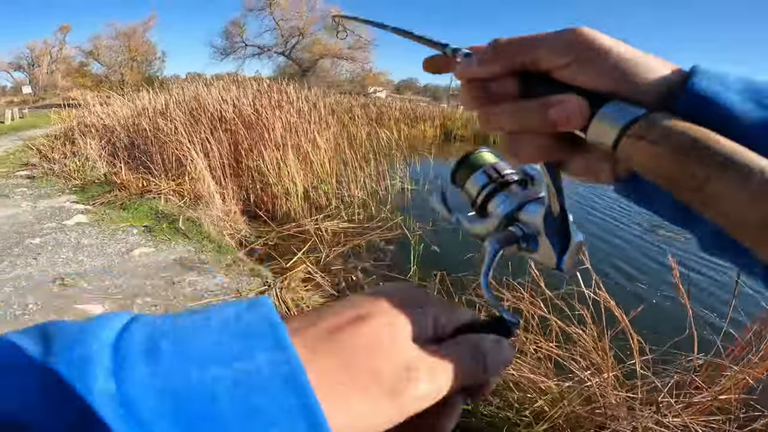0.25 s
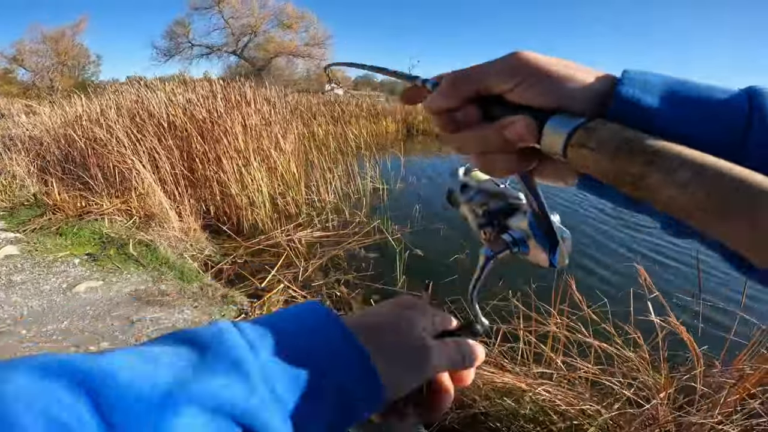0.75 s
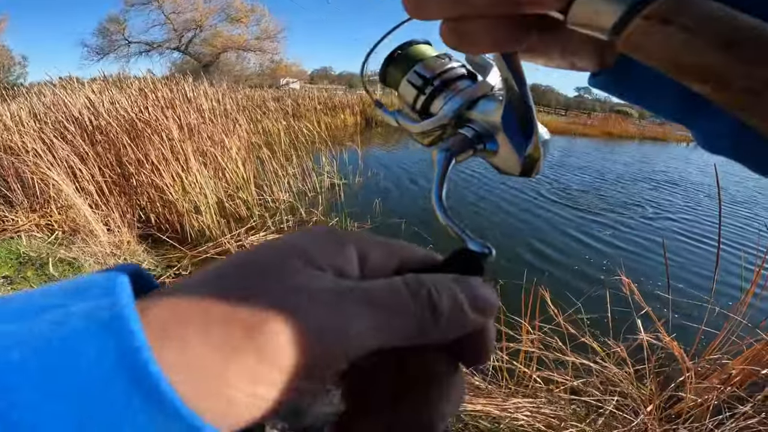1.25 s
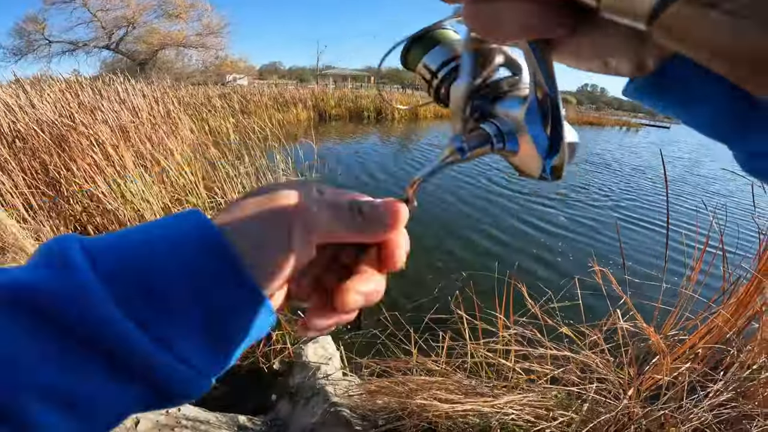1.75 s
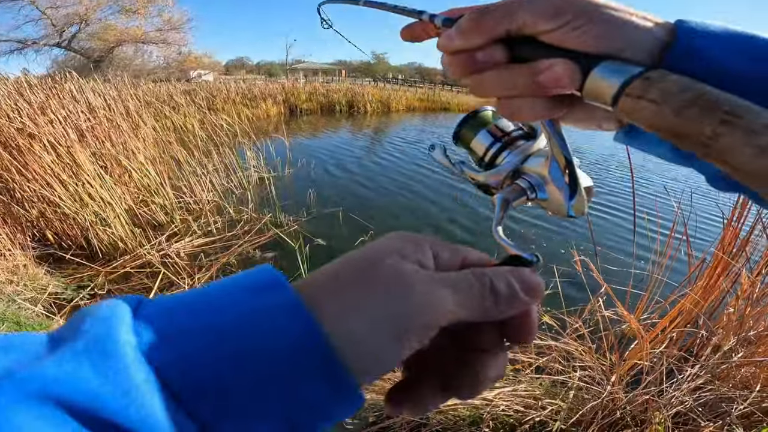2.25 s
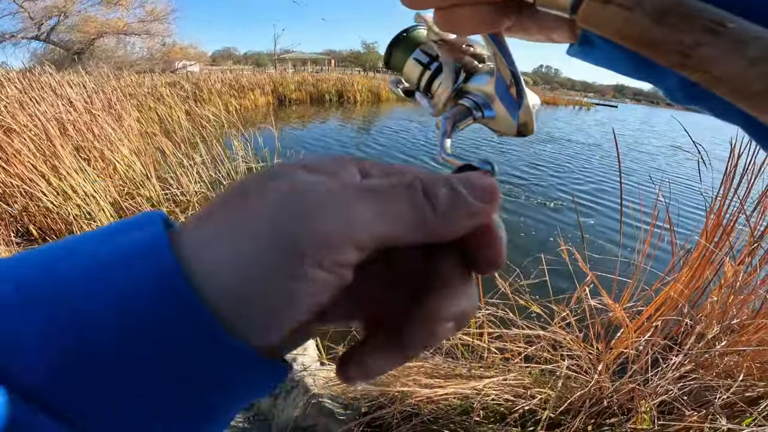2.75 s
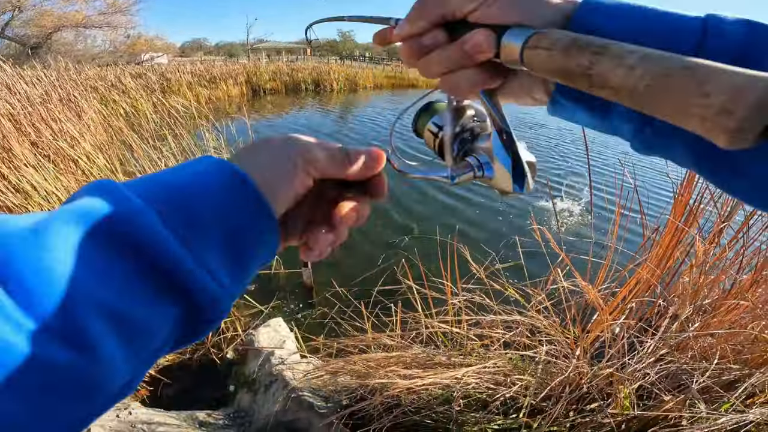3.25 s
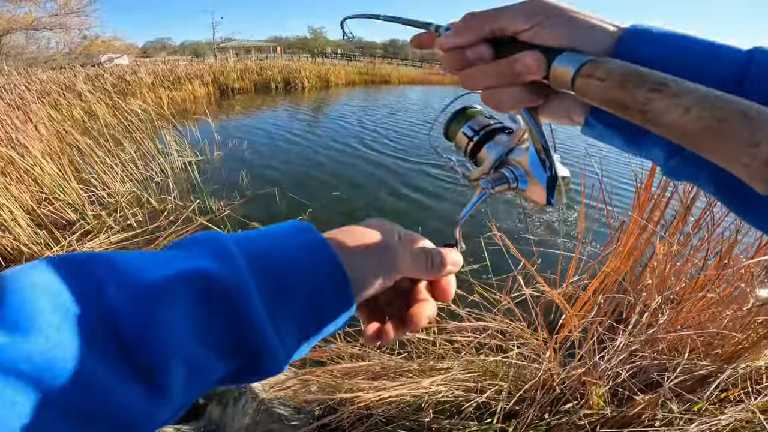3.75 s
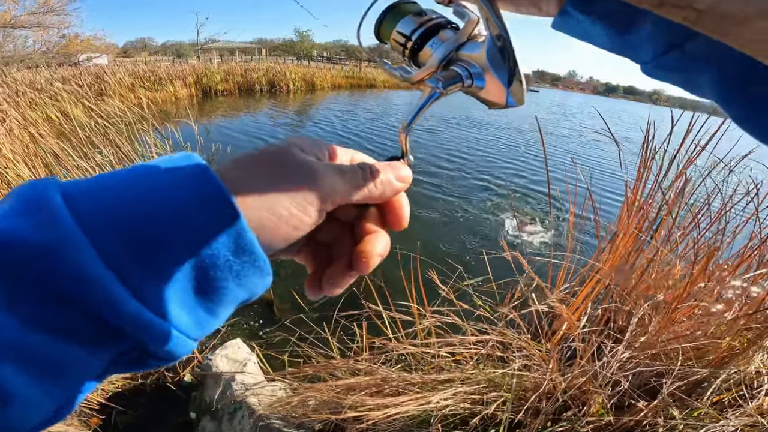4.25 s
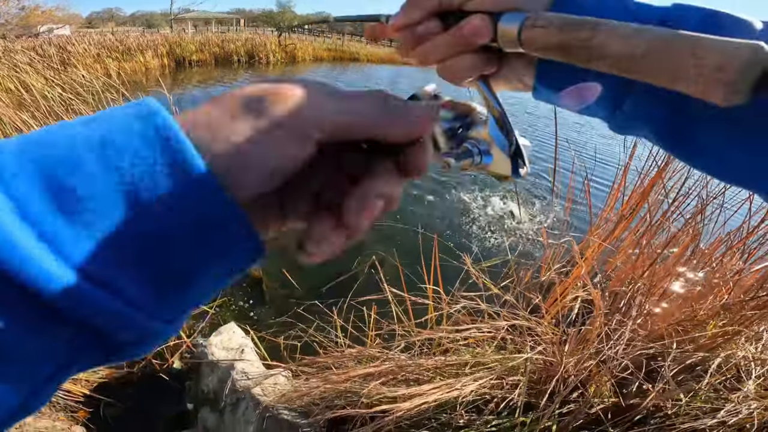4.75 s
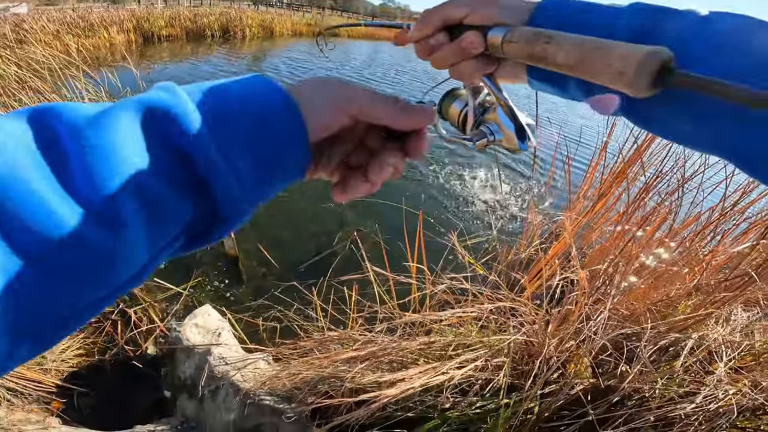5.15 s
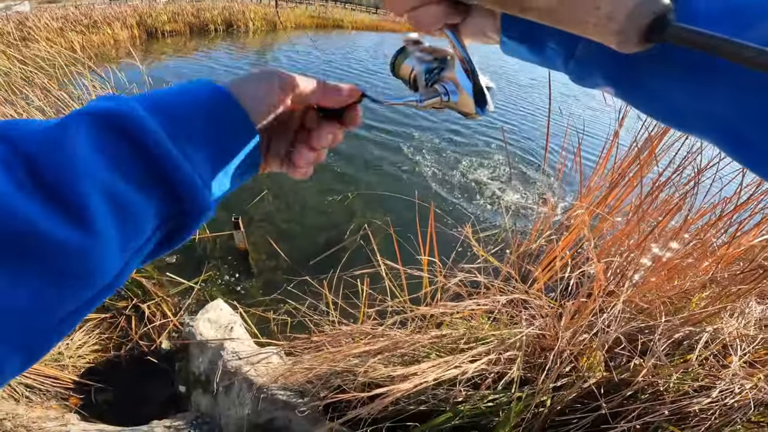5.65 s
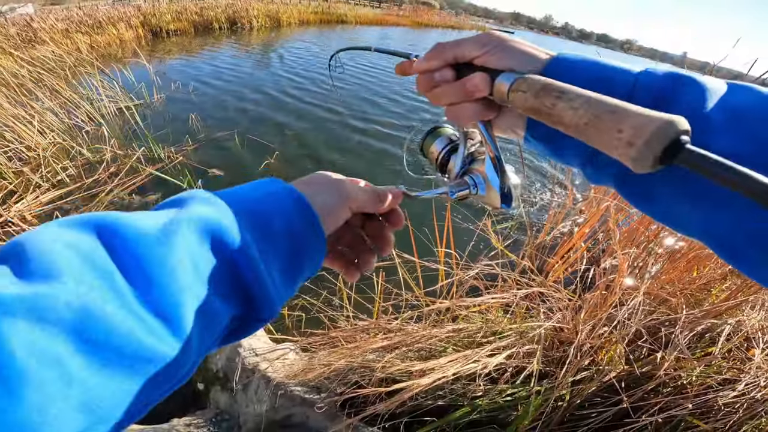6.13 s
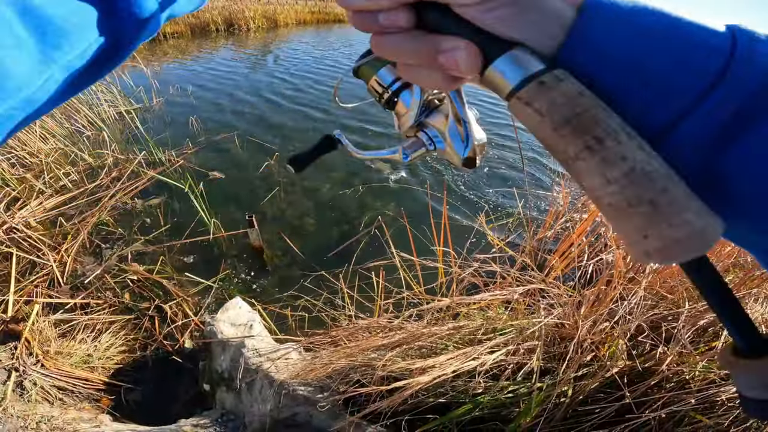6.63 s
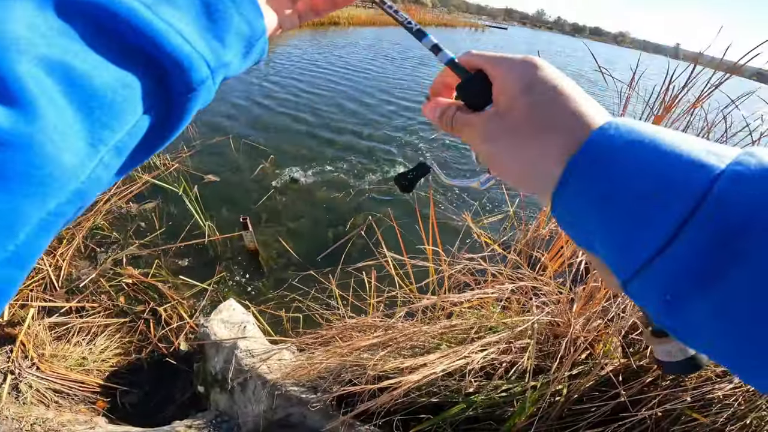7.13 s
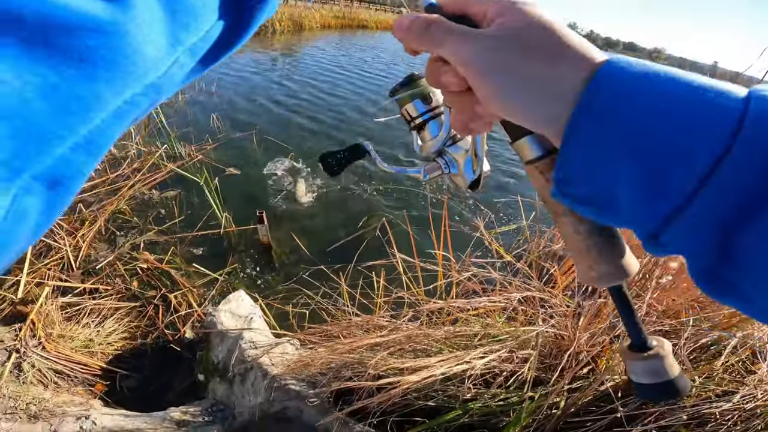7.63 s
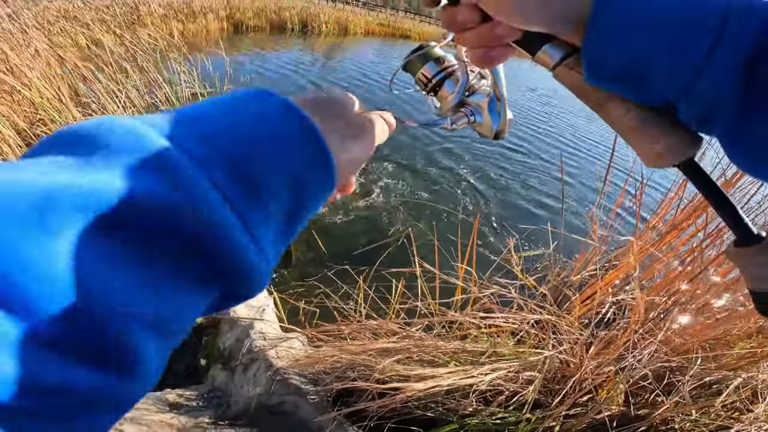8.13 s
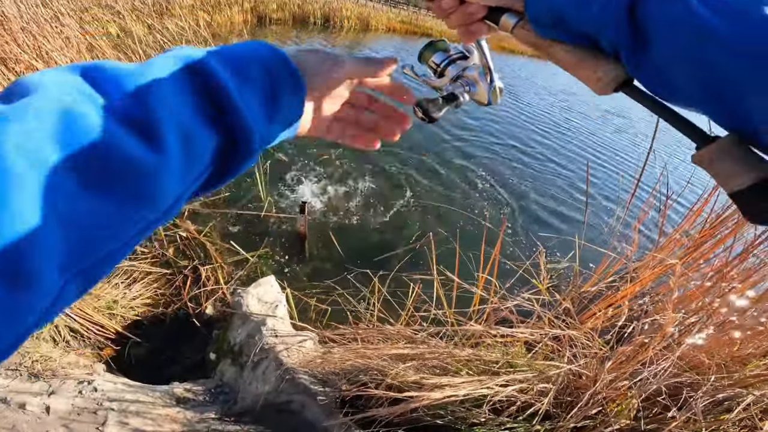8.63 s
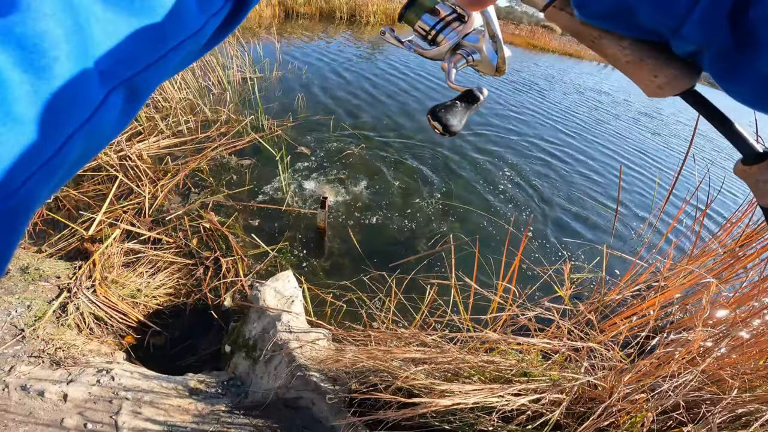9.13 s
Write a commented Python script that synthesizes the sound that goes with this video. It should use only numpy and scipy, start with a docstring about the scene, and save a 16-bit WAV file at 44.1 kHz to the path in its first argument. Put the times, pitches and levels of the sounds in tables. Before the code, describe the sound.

A fishing reel is very close, a fish a few metres off in a pond, in open air with little echo. From 0 to 4 seconds the reel dominates: lone bright metallic ticks and short ratcheting buzzes that speed up and slow down, fastest around 0.5-0.9 s, with more at 1.6-2.4, 2.8-3.1 and 3.4-4.1. A small plop comes at 0.25, a brief hand scuff near 1.4, light splashing around 3.1-3.5. At 4.1-5.6 sharp wet slaps, gulps and bubbly churning mix with sparser clicks. Two last smooth zips run from about 6.0 to 6.6, then two ticks. Splashing returns at 6.8, and from 7.6 to the end thrashing is busy, with deep hollow gulps near 8.4 and 9.0 and fine drops pattering. Faint breeze throughout; low air rumble and dull thumps on the microphone, strongest around 5-5.6, 7 and 8.9.

```python
"""A spinning reel clicks close by as a fish pulls line: a pawl ticks over the spool teeth, from lone clicks to a buzz.
Each click is a short bending ring of the pawl plus ringing spool parts and a speck of noise.
The fish thrashes in a pond: noise slaps, gulping air pockets, swarms of bubbles, spray and rising swirl notes.
Filtered noise makes the scuffs of a hand, the air and sleeves buffeting the microphone, and a faint breeze."""
import sys
import numpy as np
from scipy import signal
from scipy.fft import rfft, irfft, next_fast_len
from scipy.io import wavfile
from scipy.ndimage import uniform_filter1d

SR = 44100
rng = np.random.default_rng(int(sys.argv[2]) if len(sys.argv) > 2 else 0)


def wrap_up_sound(samples):
    """Save the sound to the file named by the first command line argument, as 16-bit audio."""
    columns = np.atleast_2d(samples).T
    # keep every value between -1 and 1, then stretch to whole-number steps
    tamed = np.clip(columns, -1, 1)
    steps = np.round(tamed * 32767).astype(np.int16)
    wavfile.write(sys.argv[1], SR, steps)


N = 413725
TIME = np.arange(N) / SR

# All levels in the tables are starting levels; the functions trim or vary many of them.
# breeze in the reeds, tone colour: (frequency [Hz], relative level [dB])
REED_COLOUR = [(88, -11.5), (150, -6), (331, -6.5), (357, -8), (468, -8), (601, -13), (742, -15),
               (818, -18), (1070, -15), (1670, -19.5), (2600, -24.5), (6940, -34.5), (15000, -51)]
# breeze, loudness over time: (time [s], level [dB])
BREEZE_LEVEL = [(0, -43.5), (2.7, -47), (4, -47.5), (6.2, -49), (9.38, -50)]
# gusts of air and sweeps of a sleeve over the microphone: (middle [s], half length [s], level [dB])
GUSTS = [(.55, 0.4, -36.5), (1.122, 0.25, -29), (1.947, 0.3, -33), (3.24, 0.34, -38.5), (4.2, .07, -41),
         (5.069, 0.13, -25), (5.383, 0.079, -24), (5.6, 0.058, -24), (6.406, .25, -25.5),
         (6.983, 0.24, -21.5), (7.403, 0.25, -27.5), (7.984, 0.21, -24), (8.35, 0.49, -32.5),
         (8.916, 0.042, -21.5), (9.26, 0.065, -35)]
# rumble of air and sleeves, tone colour: (frequency [Hz], relative level [dB])
RUMBLE_COLOUR = [(12, 7), (28, 7), (60, 1.5), (110, -7.5), (170, -18.5), (300, -28.5), (700, -85)]
# soft knocks on the camera mount: (time [s], peak level [dB], pitch [Hz])
KNOCKS = [(1.085, -22.5, 110.3), (1.133, -29, 100), (5.095, -20, 45.04), (5.371, -16, 45.1),
          (5.601, -22, 100.4), (5.638, -20.5, 90), (6.157, -25, 40.5), (6.95, -14.5, 98),
          (7.053, -13.5, 113), (7.38, -18.5, 102), (8.459, -24, 90), (8.917, -15.5, 68),
          (9.258, -24.5, 102)]
# a hand shifts its grip on the rod, one scuff each: (time [s], level [dB])
GRIP_SCUFFS = [(1.391, -39.5), (1.434, -37.5), (1.483, -30)]
# skin on the handle, tone colour: (frequency [Hz], relative level [dB])
GRIP_COLOUR = [(300, -10), (800, -9.5), (1300, 0.5), (1600, -9), (2100, -8), (2500, -25), (7000, -28),
               (14000, -52)]
# hollows in the water that close: (start [s], length [s], first pitch [Hz], last pitch [Hz], level [dB])
SWIRLS = [(2.365, 0.046, 399, 595.7, -37.5), (2.53, 0.086, 219.9, 441, -39.5),
          (2.57, 0.077, 512, 1365, -43.5), (6.92, 0.14, 330, 820, -39.5), (7.05, 0.065, 438, 563, -50),
          (7.32, 0.076, 335, 608, -41)]
# trapped air pockets: (time [s], starting pitch [Hz], level [dB], time to fade by 60 dB before stretching [s])
AIR_POCKETS = [(0.24, 404, -19.5, 0.034), (2.579, 604, -29, .02), (3.067, 507, -27, 0.035),
               (3.117, 835, -25.5, 0.04), (3.191, 531, -21, 0.016), (3.524, 1240, -27.5, 0.016),
               (3.553, 360, -29, 0.033), (3.559, 180, -35.5, .3), (4.468, 548, -18.5, 0.034),
               (4.476, 980, -21.5, 0.021), (4.57, 497, -23, .067), (4.627, 1400, -2.5, 0.0049),
               (5.179, 428, -23.5, 0.02), (5.315, 665, -20.5, 0.032), (5.406, 1205, -15.5, 0.011),
               (5.571, 561, -29, 0.053), (6.762, 965, -20, 0.01), (6.799, 428, -13, 0.034),
               (6.848, 980, -23, 0.043), (6.853, 423, -13.5, 0.017), (6.869, 368, -10.5, 0.015),
               (6.969, 1100, -24.5, 0.014), (7.273, 1250, -26, .033), (7.358, 1150, -31, 0.023),
               (7.654, 490, -18.5, 0.018), (7.83, 278, -21.5, 0.035), (7.843, 1137, -13, .021),
               (8.019, 825, -15, 0.028), (8.123, 320, -16.5, 0.1), (8.229, 1080, -21, 0.023),
               (8.34, 317, -24, 0.061), (8.373, 335, -13, 0.03), (8.383, 302, -6, 0.025),
               (8.399, 474, -21, 0.044), (8.661, 1280, -13, 0.0094), (8.826, 350, -18, 0.021),
               (8.987, 246, -8.5, 0.018), (9.069, 1064, -27, 0.051), (9.157, 1020, -19, 0.012)]
# slaps of tail and body on the water: (time [s], level [dB], centre [Hz], time to fade by 60 dB [s])
SLAPS = [(4.445, -23, 3470, 0.02), (4.546, -15.5, 2960, 0.037), (4.625, -20, 1380, 0.0041),
         (4.79, -11, 3440, 0.012), (5.002, -20.5, 2537, 0.036), (5.403, -26, 2513, 0.02),
         (6.877, -19.5, 3020, 0.013), (7.653, -21, 2660, 0.02), (8.047, -17.5, 3160, 0.035),
         (8.331, -25, 2470, 0.032), (8.401, -33, 2500, 0.13), (8.656, -13.5, 3040, 0.019)]
# strokes of the thrashing fish:
# (height of the stroke [s], swell [s], time to fade by 60 dB [s], churn level [dB], spray level [dB])
STROKES = [(0.251, 0.011, 0.18, -36, -41.5), (.42, 0.17, 0.9, -46, -49), (3.11, 0.14, 1.4, -39.5, -47.5),
           (3.321, 0.079, 0.13, -37, -41), (4.15, 0.023, 0.64, -32.5, -43),
           (4.33, 0.044, 2.1, -38.5, -39.5), (4.578, .17, 1.4, -34.5, -40), (4.79, 0.078, .5, -35, -42.5),
           (5.001, 0.063, 0.31, -32, -38), (5.31, 0.18, 0.94, -33, -42.5), (5.408, 0.048, 0.55, -27, -35),
           (5.571, 0.021, 0.12, -51, -46.5), (6.769, 0.013, 0.32, -33.5, -44.5),
           (6.87, 0.028, 0.52, -32.5, -39.5), (7.07, 0.033, 0.73, -41, -43), (7.37, 0.3, 1.5, -48, -51),
           (7.657, 0.048, .2, -36, -40.5), (7.749, 0.023, .25, -35, -41.5), (7.87, 0.18, 2.7, -36.5, -42.5),
           (8.04, 0.11, 0.72, -34, -38), (8.139, 0.032, 0.34, -28, -36), (8.321, 0.039, 0.18, -28, -38),
           (8.39, 0.034, 0.37, -30, -43), (8.56, 0.092, 0.66, -38, -40.5), (8.654, 0.011, 0.1, -29, -38),
           (8.8, 0.14, 0.32, -40, -42), (9.08, 0.25, 2.2, -37, -43.5), (9.27, 0.18, 0.19, -40, -39)]
# bubbles and wash, tone colour: (frequency [Hz], relative level [dB])
BUBBLE_COLOUR = [(200, 3.5), (320, -2.5), (480, -1.5), (750, -3), (1150, 5), (1800, -11.5), (3000, -5),
                 (6000, -34)]
# thrown drops and mist, tone colour: (frequency [Hz], relative level [dB])
SPRAY_COLOUR = [(500, -6), (1300, -2), (2000, -9), (3900, 3), (5300, -1.5), (7000, 1.5), (8300, -8),
                (10500, -8.5), (14000, -21), (16000, -56)]
# the two microphone ports: (frequency [Hz], left minus right level [dB], lead of the left [radians])
PORTS = [(300, 0, -0.14), (790, -2, -0.47), (1760, 0.5, -0.81), (2080, -9, -0.46), (2900, -0.5, -.5),
         (5660, -3, -0.69), (7300, 0, 0.48), (9900, 0, -0.1), (11300, 2, -0.8), (13600, 1, 1.4)]
# lone clicks of the pawl: (time [s], level [dB])
LONE_CLICKS = [(.016, -21.5), (.098, -22), (.357, -22), (1.401, -21), (1.506, -18), (1.539, -21),
               (1.572, -23), (2.609, -21), (2.78, -23.5), (4.208, -23.5), (4.264, -21), (4.313, -25),
               (4.455, -20.5), (4.477, -24), (4.519, -26), (4.861, -21), (4.871, -31.5), (5.142, -23.5),
               (5.25, -26), (6.646, -24), (6.687, -24)]
# pulls of the fish that slip the drag:
# (start [s], rise [s], fall [s], top speed before creep [clicks per s], click level [dB])
PULLS = [(0.161, 0.061, 0.095, 169, -21), (.492, 0.071, 0.092, 430, -23), (0.661, 0.12, 0.19, 440, -24),
         (.93, 0.094, 0.14, 106, -22.5), (1.005, 0.021, .025, 190, -19.5), (1.592, 0.12, 0.14, 196, -20),
         (1.818, 0.06, .048, 227, -22), (2.022, 0.093, 0.098, 310, -22), (2.168, 0.059, 0.077, 158, -23),
         (2.25, 0.27, 0.074, 135, -22), (2.816, 0.13, .14, 212, -22), (2.969, 0.15, 0.071, 220, -23),
         (3.309, 0.025, 0.039, 67, -26), (3.36, 0.045, 0.083, 265, -23), (3.538, 0.097, .18, 366, -21.5),
         (3.85, .085, .105, 100, -25), (3.99, 0.077, 0.079, 102, -24.5), (4.608, 0.085, .117, 87, -22),
         (4.911, 0.044, 0.12, 125, -22.5), (5.466, 0.032, .10, 62, -25.5), (5.59, 0.13, 0.068, 112, -24.5),
         (5.976, .15, .18, 330, -24.5), (6.16, 0.12, .303, 304, -23)]
# ringing modes of spool and body: (pitch [Hz], rough time to fade by 60 dB [s], level [dB])
SPOOL_MODES = [(2550, .011, -18), (3350, .007, -17), (4100, .006, -16), (7000, .004, -7), (9270, .006, -14),
               (9900, .01, -18), (11500, .003, -16), (13900, .002, -14)]
# noise where pawl and teeth touch, tone colour: (frequency [Hz], relative level [dB])
CONTACT_COLOUR = [(500, -14.5), (1700, -11.5), (2500, -5), (4200, -3), (5500, -1), (7200, -6), (8300, -5.5),
                  (9500, -6), (12000, -8.5), (14500, -8), (15700, -39)]

TOP_HZ = 15900
CALM_DB = -40.5  # rumble between the gusts, before trimming
SCUFF_SWELL_S, SCUFF_T60_S = 0.0088, 0.13
SPRAY_LINGERS = 1.75  # thrown drops outlast the churning by this factor
WASH_DB = -3.5
CREEP_RATE = 22  # clicks per s, added whenever the spool moves
PULL_SHAPE = 1.4  # how peaked a pull is
# the pawl's basic pitch, its rise per click per s, and the time over which speed is averaged for it
PAWL_REST_HZ, PAWL_RISE_HZ, PAWL_AVERAGE_S = 5228, 1.21, 0.2
RUB_GROWTH = .6  # power by which rubbing grows with speed
# change in click force per doubling of speed, counted from this many clicks per s
FLICK_DB, FLICK_AT_RATE = -0.12, 127


def undb(db):
    """Turn decibels into a multiplying factor."""
    return 10 ** (np.asarray(db) / 20)


def unit(x):
    """Scale to an average strength (rms) of 1."""
    return x / np.sqrt(np.mean(x ** 2) + 1e-18)


def add(out, s, sound):
    """Mix a sound in from time s on."""
    i = int(np.clip(s * SR, 0, N - 1))
    out[..., i:i + sound.shape[-1]] += sound[..., :N - i]


def fade(t, t60):
    """Die away steadily, by 60 dB in t60 seconds."""
    return np.exp(-np.log(1000) * t / t60)


def swell(s, rise_s, t60):
    """Swell to 1 at time s, then die away."""
    t = TIME - s
    drop = np.where(t < 0, (t / rise_s) ** 2, np.log(1000) * t / t60)
    return np.exp(-np.minimum(drop, 20))


def walk(rate):
    """Wander slowly by chance, with a spread of 1."""
    step = max(int(SR / rate), 1)
    held = np.repeat(rng.standard_normal(N // step + 1), step)
    return unit(uniform_filter1d(held, step)[:N])


def colour(x, points):
    """Shape a sound by a tone colour table, keeping the power of white noise."""
    size = next_fast_len(N + 2048)
    hz, db = np.transpose(points)
    f = np.arange(size // 2 + 1) * SR / size
    gain = undb(np.interp(np.log(f + 1), np.log(hz), db))
    return irfft(rfft(x, size) * unit(gain), size)[..., :N]


def stereo(mid, side=0, pan_db=0):
    """Make left and right from their shared and opposite parts."""
    return np.array([(mid + side) * undb(pan_db / 2), (mid - side) * undb(-pan_db / 2)])


def at_ports(x):
    """The camera's body gives each port its own level and timing at each pitch."""
    size = next_fast_len(N + 2048)
    hz, pan_db, lead = np.transpose(PORTS)
    f = np.arange(size // 2 + 1) * SR / size
    half = undb(np.interp(f, hz, pan_db) / 2) * np.exp(.5j * np.interp(f, hz, lead))
    return irfft(rfft(x, size) * np.array([half, 1 / half]), size)[:, :N]


def scatter(x, wet_db, t60):
    """Ground, body and reeds throw back a short diffuse tail."""
    t = np.arange(SR // 4) / SR
    tail = rng.standard_normal((2, len(t))) * fade(t, t60) * (t > .003)
    tail /= np.sqrt(np.sum(tail ** 2, axis=1, keepdims=True))
    return x + undb(wet_db) * signal.fftconvolve(x, tail, axes=1)[:, :N]


def reeds(width=0.28):
    """A faint, gently swelling breeze along the bank, made of shaped noise."""
    level_db = np.interp(TIME, *np.transpose(BREEZE_LEVEL)) + walk(2.954)
    mid, side = colour(rng.standard_normal((2, N)), REED_COLOUR) * undb(level_db)
    return stereo(mid, width * side)


def buffeting(air_db=-3, lumps_db=3, bump_db=0, width=0.058):
    """Lumpy rumble of air and sleeves, with soft knocks through the mount; stronger on the right."""
    power = undb(CALM_DB) ** 2
    for s, half_s, db in GUSTS:
        gust = undb(db) / (1 + ((TIME - s) / half_s) ** 4)
        power = power + gust ** 2
    level_db = air_db + 10 * np.log10(power) + lumps_db * walk(28)
    mid, side = colour(rng.standard_normal((2, N)), RUMBLE_COLOUR) * undb(level_db)
    for s, db, hz in KNOCKS:
        # one smooth bump with a dip on either side
        turn = np.pi * hz * (TIME - s)
        mid = mid + undb(db + bump_db) * (1 - 2 * turn ** 2) * np.exp(-turn ** 2)
    return stereo(mid, width * side, pan_db=-5)


def grip(slips_per_s=900, hiss=0.12):
    """Skin sticks and slips on the cork handle in short scuffs."""
    slipping = rng.random(N) < slips_per_s / SR
    slips = (slipping + hiss) * rng.standard_normal(N)
    pressure = sum(undb(db) * swell(s, SCUFF_SWELL_S, SCUFF_T60_S) for s, db in GRIP_SCUFFS)
    return stereo(unit(colour(slips, GRIP_COLOUR)) * pressure)


def swirls(rough=.5):
    """A hollow left by the fish's tail shrinks, so its note climbs."""
    out = np.zeros(N)
    waver = 1 + rough * walk(150)
    for s, length, first_hz, last_hz, db in SWIRLS:
        u = np.linspace(0, 1, int(length * SR))
        hz = first_hz * (last_hz / first_hz) ** u
        note = np.sin(2 * np.pi * np.cumsum(hz) / SR)
        add(out, s, undb(db) * np.sin(np.pi * u) * note)
    return stereo(out * waver)


def bubble(hz, t60, glide, rise_cycles):
    """An air pocket rings and climbs in pitch as it nears the surface."""
    t = np.arange(int(t60 * SR) + 2) / SR
    ring = np.sin(2 * np.pi * hz * (t + glide * t * t / t60 / 2))
    onset = 1 - np.exp(-(t * hz / rise_cycles) ** 2)
    return ring * fade(t, t60) * onset


def swarm(low_hz, high_hz, cycles, glide, scatter_db, width, count):
    """A steady swarm of small bubbles of all sizes, each from its own direction."""
    out = np.zeros((2, N))
    for when, size, ring, loud, where in rng.random((count, 5)):
        hz = low_hz * (high_hz / low_hz) ** size
        sound = bubble(hz, cycles * (.5 + ring) / hz, glide, 0.92)
        sound = sound * undb(-scatter_db * np.log(loud + .04))  # a few stand out
        lean = width * (where - .5)
        add(out, when * N / SR, np.outer([1 + lean, 1 - lean], sound))
    return out


def blows(plop_db=3, glide=0.095, ring=1.22, slap_db=-3, slap_octaves=0.88):
    """Slaps crack on the surface as bursts of noise; the air they drag under gulps."""
    out = np.zeros(N)
    for s, hz, db, t60 in AIR_POCKETS:
        add(out, s, undb(db + plop_db) * bubble(hz, ring * t60, glide, 0.46))
    t = np.arange(4096) / SR
    for s, db, hz, t60 in SLAPS:
        band = np.clip(hz * 2 ** (slap_octaves * np.array([-1, 1])), 50, .45 * SR)
        band_filter = signal.butter(2, band, "band", fs=SR, output="sos")
        crack = signal.sosfilt(band_filter, rng.standard_normal(len(t)) * fade(t, t60))
        add(out, s, undb(db + slap_db) * crack / np.abs(crack).max() * 2)
    return stereo(out)


def thrashing(churn_db=-2, drops_db=1, mist_db=-5, width=0.045):
    """The fish's effort drives bubbles and the wash of broken water; thrown drops patter back through a mist."""
    effort, thrown = np.zeros((2, N))
    for s, rise_s, t60, db, spray_db in STROKES:
        effort = np.maximum(effort, undb(db) * swell(s, rise_s, t60))
        thrown = np.maximum(thrown, undb(spray_db) * swell(s, rise_s, SPRAY_LINGERS * t60))
    bubbles = swarm(326.2, 2057, cycles=26.0, glide=0.17, scatter_db=7.0, width=0.13, count=4500)
    churn = unit(colour(bubbles, BUBBLE_COLOUR))
    patter = swarm(1380, 13200, cycles=47, glide=0.11, scatter_db=7, width=0.71, count=16000)
    drops = unit(colour(patter, SPRAY_COLOUR))
    # noise with a flickering level
    wash = colour(rng.standard_normal((2, N)) * undb(4.03 * walk(70)), BUBBLE_COLOUR)
    mist = colour(rng.standard_normal((2, N)) * undb(2 * walk(110)), SPRAY_COLOUR)
    mid, side = effort * undb(WASH_DB) * wash + thrown * undb(mist_db) * mist
    swarms = effort * undb(churn_db) * churn + thrown * undb(drops_db) * drops
    return swarms + stereo(mid, width * side)


def spool():
    """Each pull speeds the spool up and lets it run down: gives speed (clicks per s) and click level (dB)."""
    speed, weighted_db = np.zeros((2, N))
    for s, rise, fall, rate, db in PULLS:
        t = TIME[:int((rise + fall) * SR)]
        progress = np.interp(t, [0, rise, rise + fall], [0, .5, 1])
        hump = rate * np.abs(np.sin(np.pi * progress)) ** PULL_SHAPE + 1e-6
        add(speed, s, hump)
        add(weighted_db, s, hump * db)
    return speed + CREEP_RATE * (speed > 0), weighted_db / (speed + 1e-18)


def teeth(speed, level_db, jitter=0.03, scatter_db=1.94, wobble_db=1.98):
    """One click (time, dB) each time the slipping spool turns by a tooth; its wobble makes the clicks swell."""
    clicks = list(LONE_CLICKS)
    for start, stop in np.flatnonzero(np.diff(speed > 0)).reshape(-1, 2) + 1:
        turned = np.cumsum(speed[start:stop]) / SR  # in teeth
        marks = np.linspace(0, turned[-1], round(turned[-1]) + 1)
        at = start + np.searchsorted(turned, marks)
        shift, loud, wobble = rng.standard_normal((512, 3))[:len(at)].T
        wobble = 2 * np.tanh(uniform_filter1d(wobble, size=4) * 2)
        shift = jitter * shift / np.maximum(speed[at], 100)
        force_db = level_db[at] + FLICK_DB * np.log2(speed[at] / FLICK_AT_RATE)
        clicks += zip(at / SR + shift, force_db + scatter_db * loud + wobble_db * wobble)
    return clicks


def flick(t, peak_s):
    """A ring's strength builds up until peak_s and is choked as the pawl seats."""
    return (t / peak_s) ** 1.5 * np.exp(1.5 * (1 - t / peak_s))


def reel(pawl_db=-2.0, pawl_s=0.00081, chirp=0.28, detune=0.033, wander=0.036,
         mode_detune=0.042, mode_turn=0.74, mode_scatter_db=1.9, mode_drift_db=2.5,
         spool_db=-2, contact_db=-12, rub_db=-42, width=0.57,
         rim_hz=6700, rim_db=-40, bail_hz=3380, bail_db=-46):
    """Each tooth flicks the pawl, which rings with the spool; the turning spool also rubs, more with speed."""
    t = np.arange(512) / SR
    rings, contact = np.zeros((2, N))
    speed, level_db = spool()
    chance = rng.standard_normal((2048, len(SPOOL_MODES) + 1, 4))
    # as the spool turns, its modes are struck now better, now worse
    drift = 3 * uniform_filter1d(chance[:, 1:, 1:], size=9, axis=0)
    hz, t60, db = np.transpose(SPOOL_MODES)[:, :, None]
    # the pawl rings higher when the spool runs fast
    load = uniform_filter1d(speed, int(PAWL_AVERAGE_S * SR) + 1)
    pawl_hz = (PAWL_REST_HZ + PAWL_RISE_HZ * load) * (1 + wander * walk(35))
    # the pawl starts stiff and high, and drops in pitch as it leaves the tooth
    bent = t + chirp * pawl_s * (1 - np.exp(-t / pawl_s))
    # the spool's thin rim and the wire bail sing on faintly after every click
    after = TIME[:SR // 5]
    rim = undb(rim_db) * np.sin(2 * np.pi * rim_hz * after)
    bail = undb(bail_db) * np.sin(2 * np.pi * bail_hz * after)
    singing = (rim + bail) * fade(after, .25)
    scrape = flick(t, .0008)
    for (s, click_db), luck, slow in zip(teeth(speed, level_db), chance, drift):
        click_hz = pawl_hz[int(s * SR)] * (1 + detune * luck[0, 0] - chirp / 4)
        pawl = np.sin(2 * np.pi * click_hz * bent) * flick(t, pawl_s)
        strength_db = db + mode_scatter_db * luck[1:, :1] + mode_drift_db * 2 * np.tanh(slow[:, :1])
        mode_hz = hz * (1 + mode_detune * slow[:, 1:2])
        modes = np.sin(2 * np.pi * mode_hz * t + np.pi * mode_turn * slow[:, 2:])
        body = undb(strength_db) * flick(t, t60 / 8) * modes
        click = undb(pawl_db) * pawl + undb(spool_db) * body.sum(axis=0)
        add(rings, s, undb(click_db) * click)
        add(rings, s, undb(click_db) * singing)
        add(contact, s, undb(click_db + contact_db) * scrape)
    rub = undb(rub_db) * (speed / 300) ** RUB_GROWTH
    mid, side = colour((contact + rub) * rng.standard_normal((2, N)), CONTACT_COLOUR)
    # the higher the sound, the less alike it arrives at the two ports
    return at_ports(rings + mid) + stereo(0, width * np.diff(side, prepend=0))


def scene():
    """Reel close by, fish a few metres out, air all round."""
    water = scatter(at_ports(thrashing() + blows() + swirls()), wet_db=-27, t60=0.35)
    near = scatter(reel(), wet_db=-15, t60=.04)
    return reeds() + buffeting() + grip() + water + near


def record(dry):
    """The camera cuts the top."""
    return signal.sosfilt(signal.ellip(8, .2, 70, TOP_HZ, fs=SR, output="sos"), dry)


dry = scene()
out = record(dry)
wrap_up_sound(out)
```